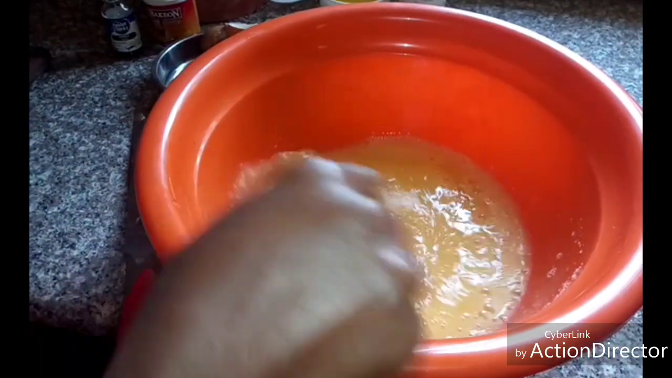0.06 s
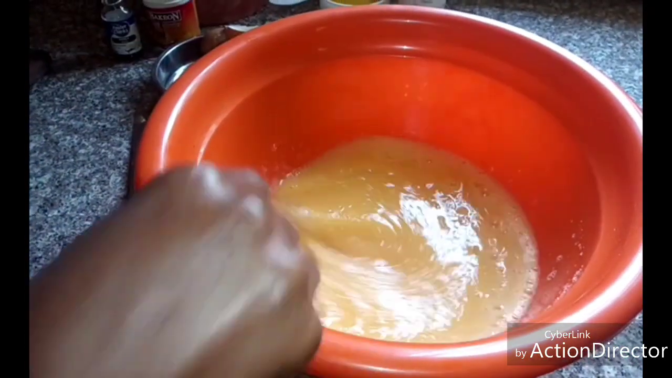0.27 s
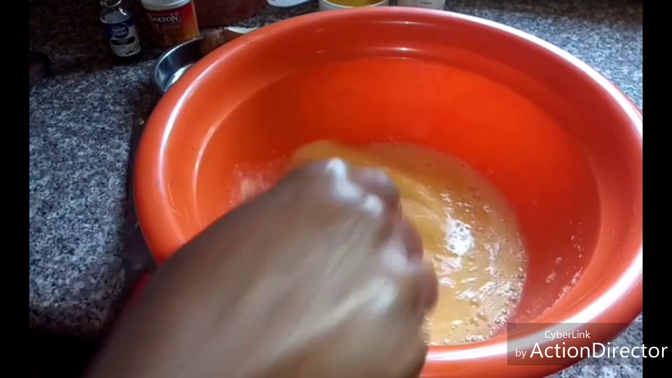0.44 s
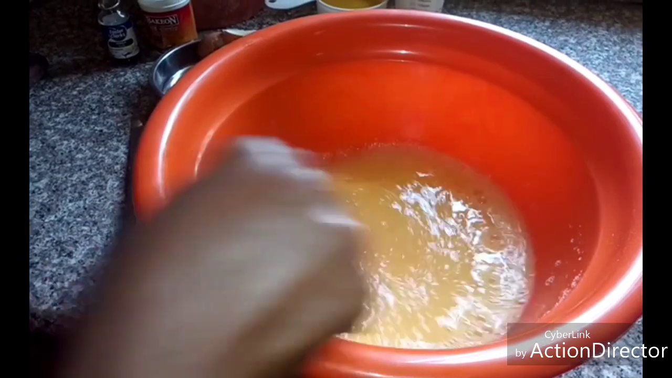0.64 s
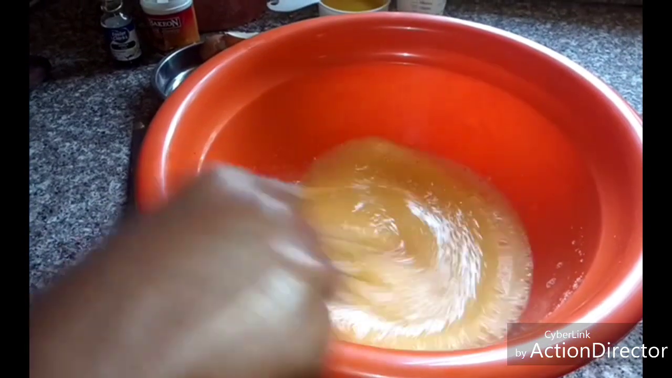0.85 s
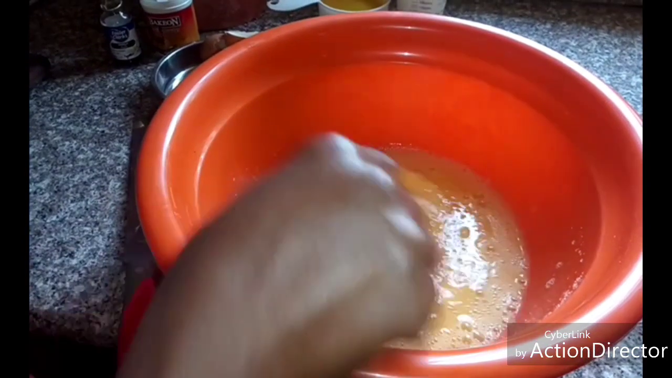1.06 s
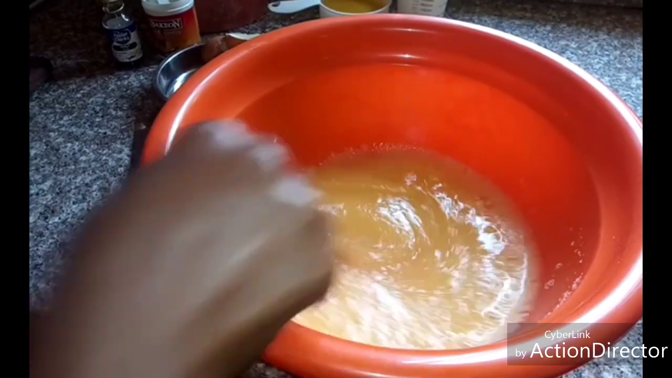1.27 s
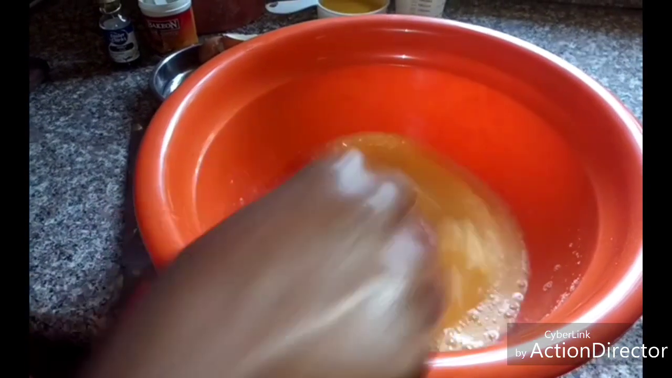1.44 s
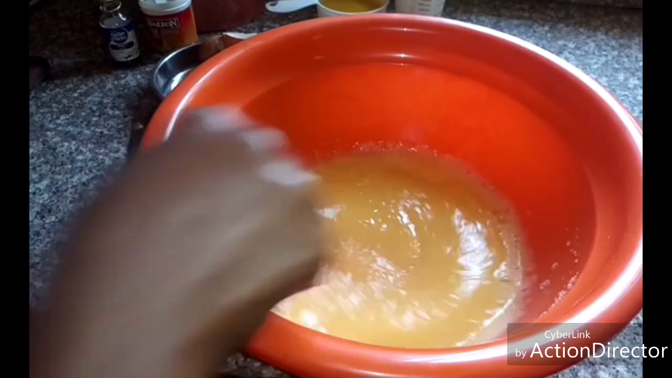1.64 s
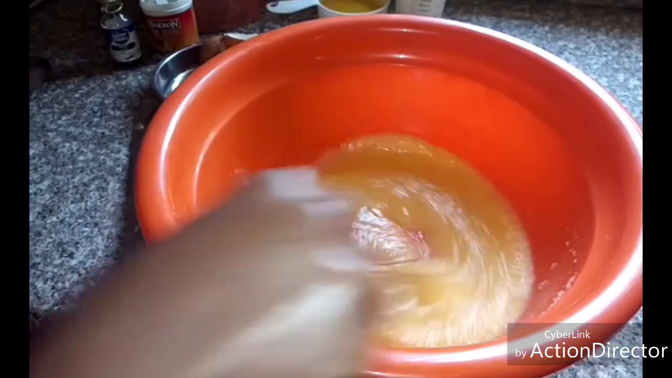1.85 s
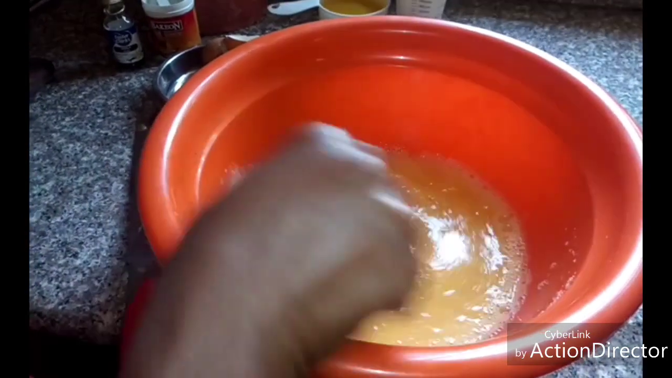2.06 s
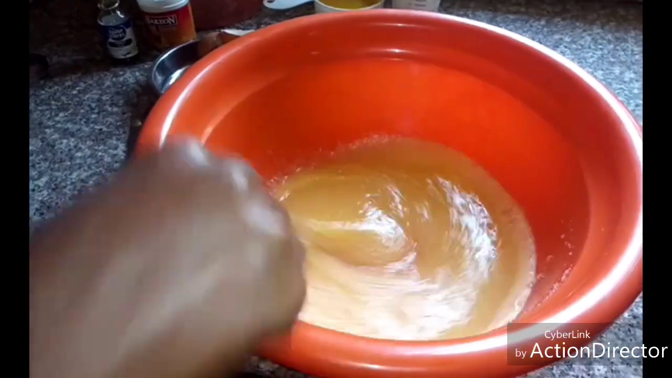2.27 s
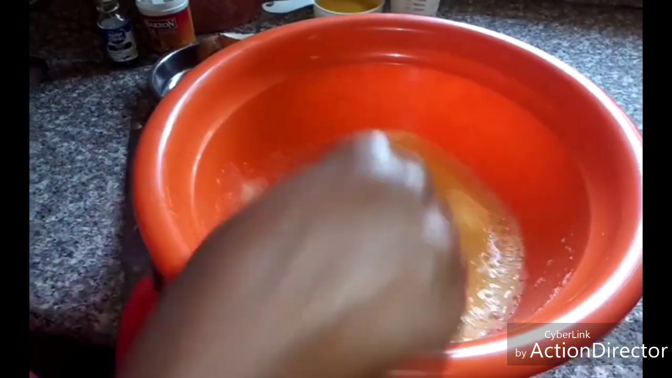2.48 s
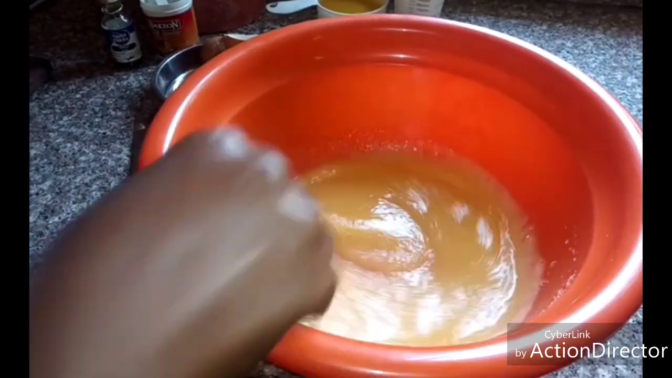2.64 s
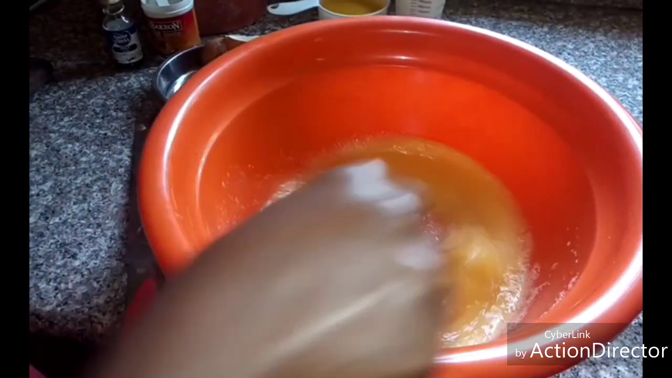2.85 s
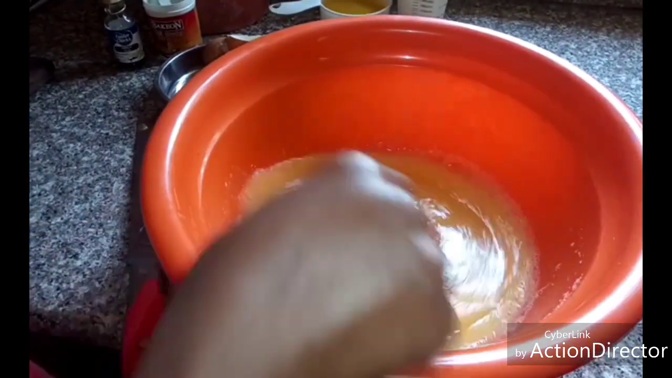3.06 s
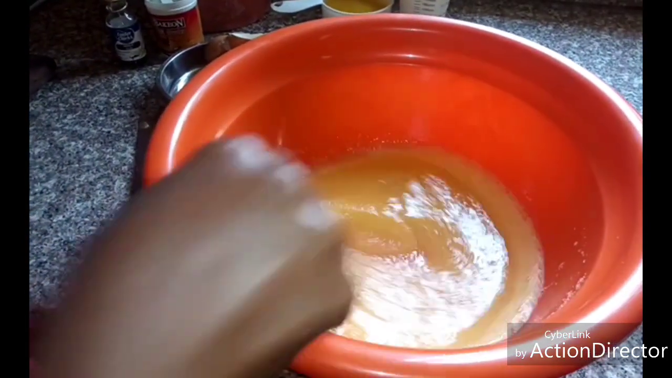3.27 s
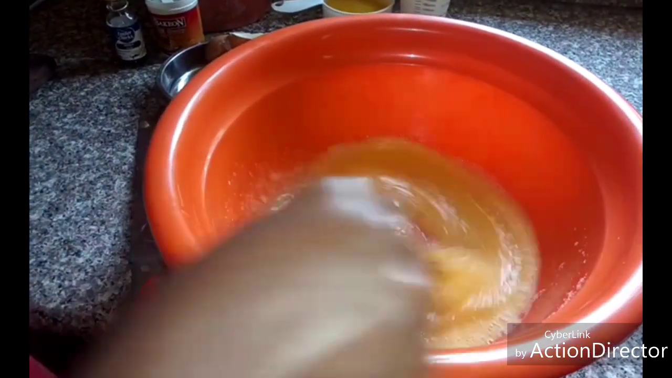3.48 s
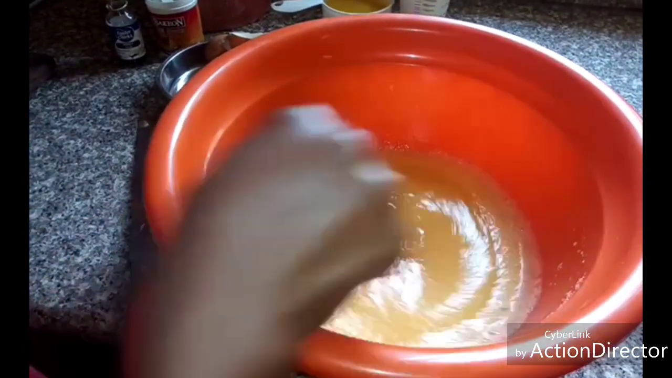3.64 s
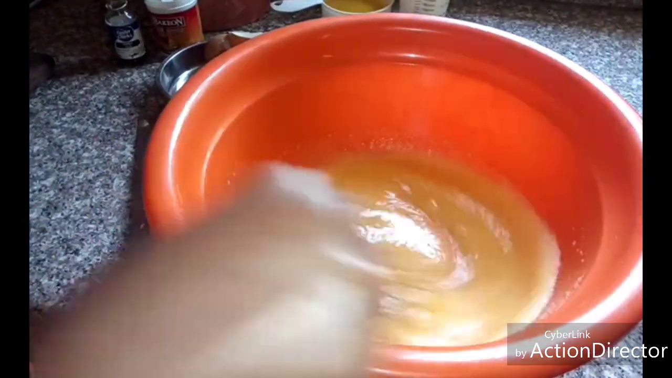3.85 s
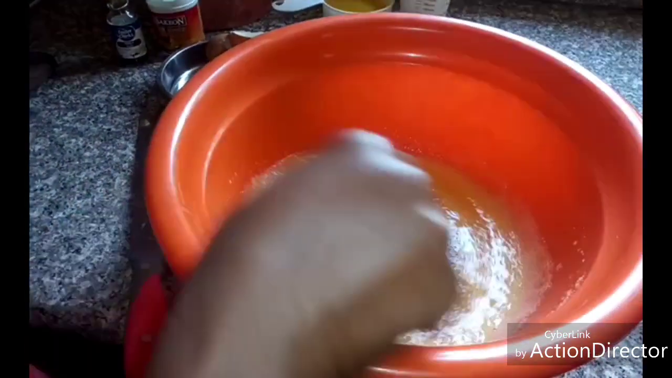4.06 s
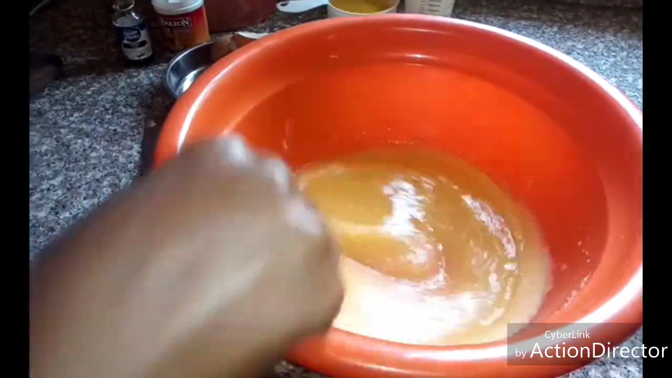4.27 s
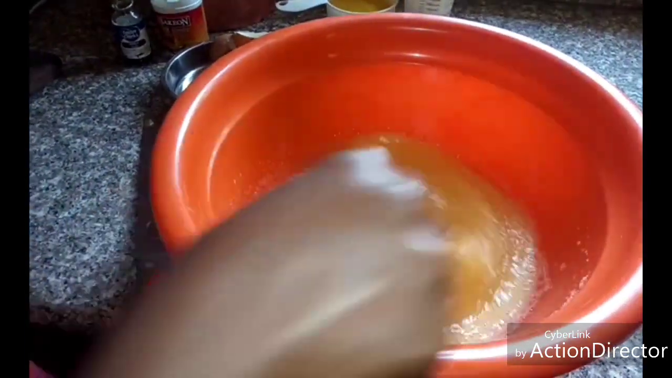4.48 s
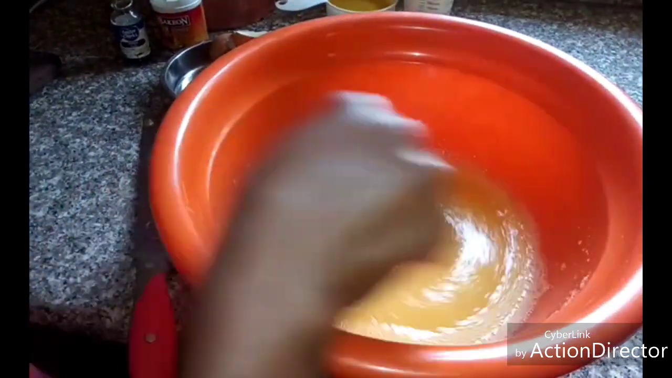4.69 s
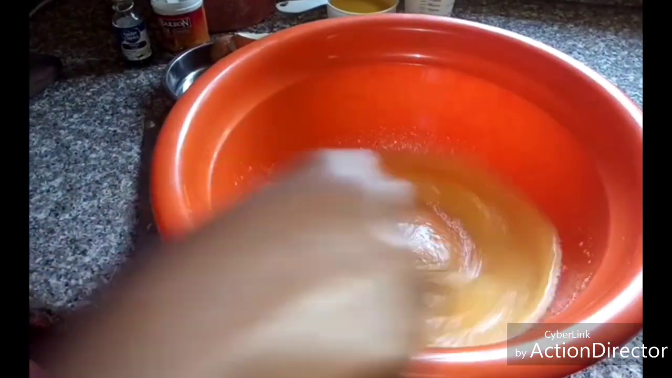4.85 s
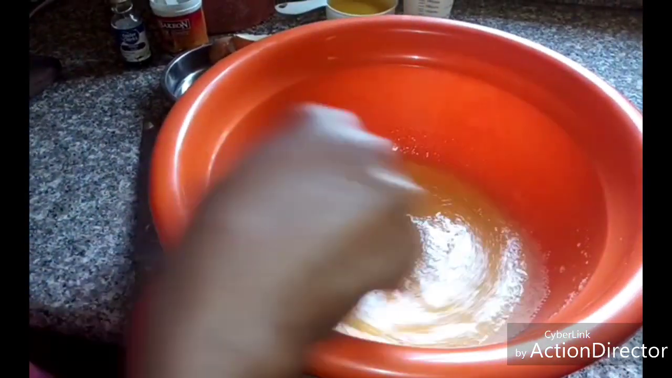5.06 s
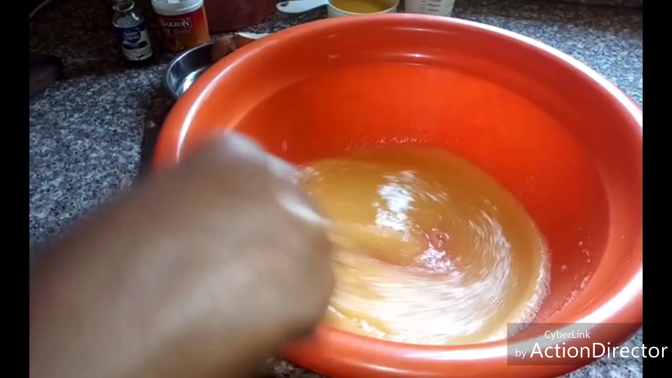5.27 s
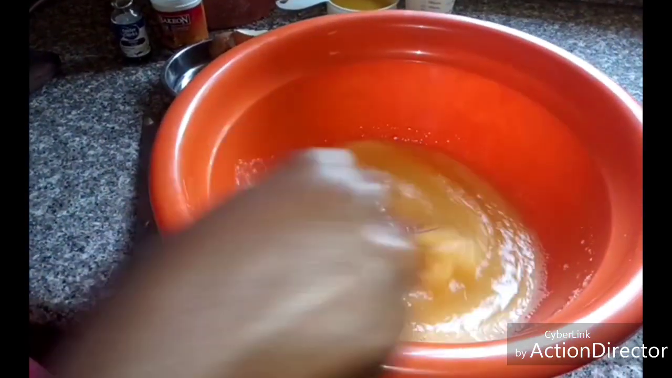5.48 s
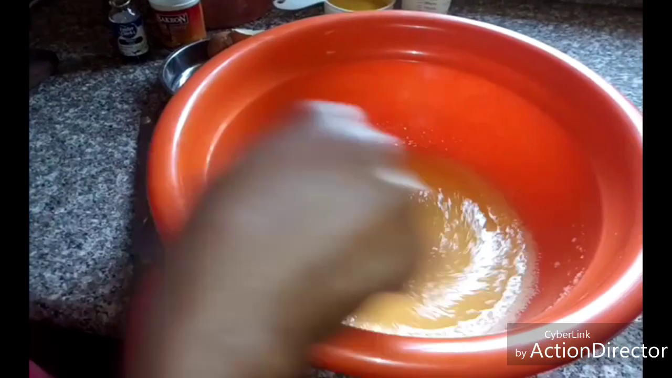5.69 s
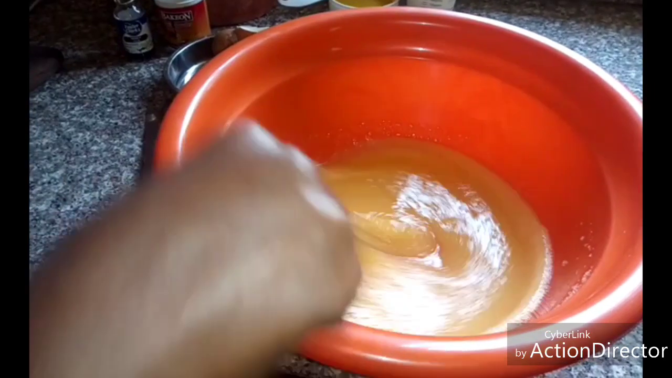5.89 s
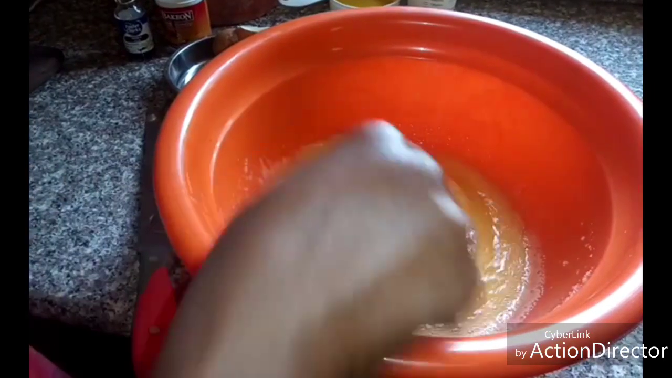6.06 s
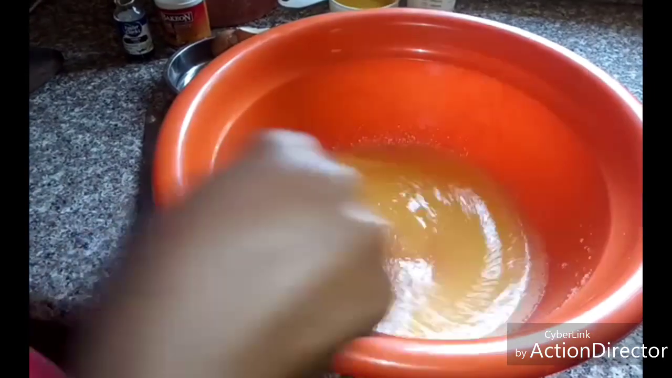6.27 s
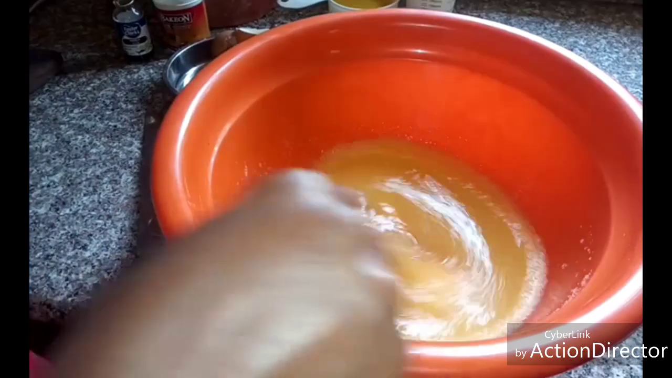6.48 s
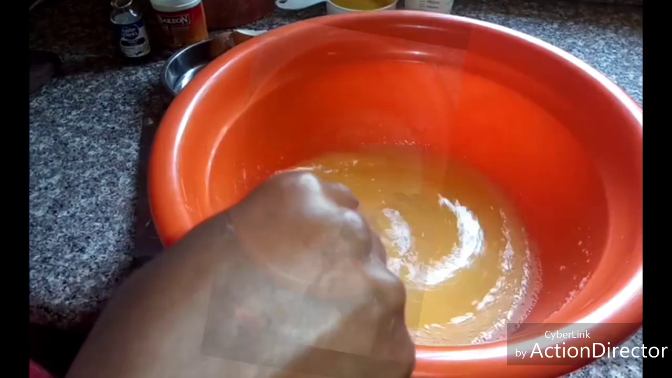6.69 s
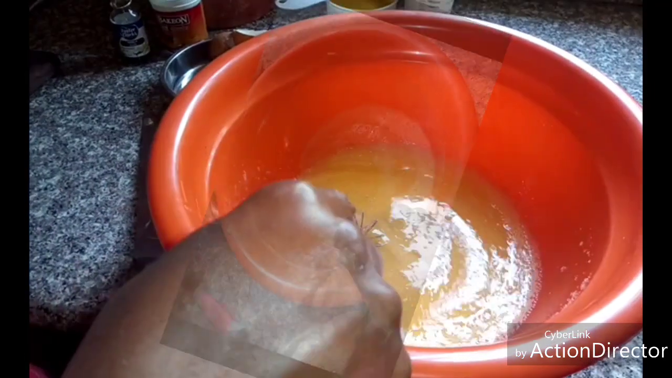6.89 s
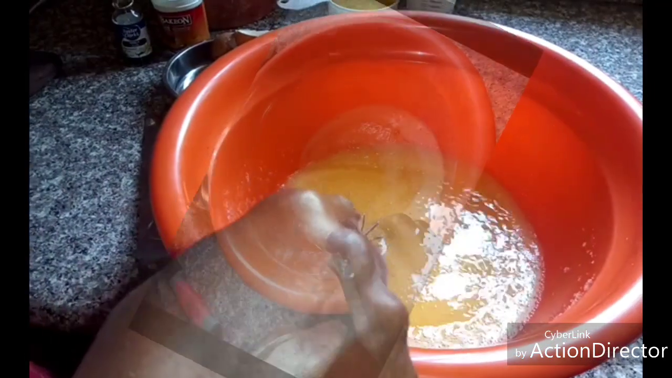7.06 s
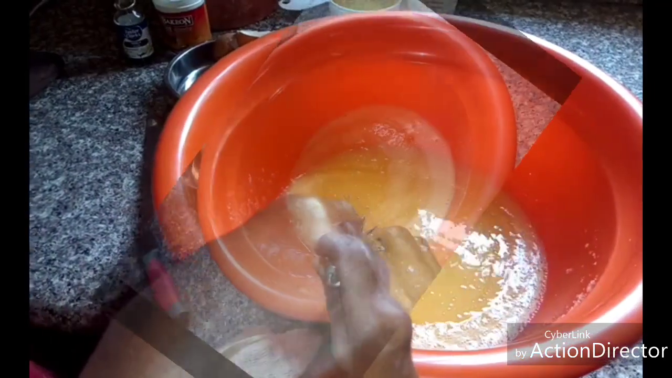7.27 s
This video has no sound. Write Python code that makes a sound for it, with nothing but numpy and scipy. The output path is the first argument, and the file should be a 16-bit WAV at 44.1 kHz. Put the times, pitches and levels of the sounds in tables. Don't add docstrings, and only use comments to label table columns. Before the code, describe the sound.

Fast wiry whisking knocks and scrapes around a hollow plastic bowl, growing harder, then suddenly ceases, leaving quiet room air, one nudge and distant chirps.

```python
import sys
import numpy as np
from scipy import signal
from scipy.fft import rfft, irfft, next_fast_len
from scipy.io import wavfile

SR = 44100
rng = np.random.default_rng(int(sys.argv[2]) if len(sys.argv) > 2 else 0)


def to_linear_factor(level_db):
    exponent = np.asarray(level_db, float) / 20
    return 10 ** exponent


def unload_wav(signal):
    wavfile.write(
        sys.argv[1],
        SR,
        np.round(np.clip(np.atleast_2d(signal).T, -1, 1) * 32767).astype(np.int16),
    )


N = 323253

# (pressure peak [s], drag level [dB], 10 dB rise [s], 10 dB fall [s], hiss re drag [dB])
STROKES = [(0.069, -36.0, 0.014, 0.272, -29.0), (0.44, -36.7, 0.071, 0.196, -32.0),
           (0.719, -34.5, 0.055, 0.254, -25.0), (1.033, -36.8, 0.012, 0.102, -20.0),
           (1.411, -37.4, 0.082, 0.892, -31.0), (1.741, -33.1, 0.041, 0.223, -29.0),
           (2.039, -30.9, 0.082, 0.278, -25.0), (2.352, -28.3, 0.015, 0.352, -28.0),
           (2.788, -27.9, 0.048, 0.153, -23.0), (3.076, -29.3, 0.035, 0.228, -26.0),
           (3.425, -26.5, 0.06, 0.032, -20.0), (3.729, -30.6, 0.138, 0.229, -23.0),
           (4.12, -31.7, 0.049, 0.033, -16.0), (4.435, -25.0, 0.036, 0.064, -28.0),
           (4.766, -27.7, 0.27, 0.114, -18.0), (5.13, -26.7, 0.03, 0.058, -26.0),
           (5.364, -28.7, 0.011, 0.281, -33.0), (5.725, -23.7, 0.019, 0.041, -19.0),
           (6.009, -32.1, 0.01, 0.232, -23.0), (6.413, -29.0, 0.037, 0.117, -44.0),
           (0.004, -32.7, 0.031, 0.024, -10.0), (0.335, -39.5, 0.116, 0.081, -18.0),
                  (1.21, -34.9, 0.009, 0.083, -25.0), (2.982, -28.3, 0.033, 0.016, -25.0),
                  (3.517, -33.5, 0.07, 0.081, -34.0), (3.959, -26.7, 0.049, 0.035, -32.0),
                  (4.078, -28.3, 0.018, 0.081, -33.0), (4.278, -35.7, 0.167, 0.054, -29.0),
                  (4.953, -33.5, 0.065, 0.104, -30.0), (5.269, -28.4, 0.041, 0.053, -41.0),
                  (5.406, -29, .008, .11, -25), (5.583, -25.9, 0.016, 0.025, -27.0),
                  (5.651, -35.7, 0.033, 0.075, -24.0), (5.896, -27.6, 0.025, 0.048, -44.0),
                  (6.221, -26.1, 0.098, 0.029, -37.0), (6.66, -42.0, 0.026, 0.05, -43.0)]
RISE_BEND, FALL_BEND = 0.8, 1.3
# (frequency [Hz], level [dB per Hz])
DRAG_SPECTRUM = [(590, -51), (1000, 1), (1410, -2), (1680, 1), (2100, 2), (2400, -1.5), (2650, -1),
                 (2950, -4), (3350, -0.5), (4120, -2.5), (6500, -14), (8500, -43.5), (11000, -69),
                 (18700, -120)]
# (frequency [Hz], level [dB per Hz])
HISS_SPECTRUM = [(7000, -25), (9000, -18.5), (10800, -11), (12600, -22.5), (13700, -15), (14900, 3),
                 (15700, 4), (16500, -20.5)]
# (frequency [Hz], width [Hz], level [dB])
HOLLOW_MODES = [(420, 60, -7), (530, 40, 0), (633, 51.3, 0.5), (783, 60, -1.5), (1052, 60, -4)]
# (frequency [Hz], width [Hz], level [dB])
ROCKING_MODES = [(64, 40, -8.5), (105.4, 49, -1), (158, 40, .5), (272, 26, 6.5)]
# (time [s], level [dB], 10 dB fall [s])
ROCK_EVENTS = [(0.142, -48.8, 0.048), (0.443, -53.2, 0.09), (0.73, -51.5, 0.118), (1.052, -47.8, 0.051),
               (1.219, -59.3, 1.332), (1.828, -52.1, 0.135), (2.046, -45.0, 0.111), (2.286, -53.2, 0.018),
               (2.403, -51.9, 0.12), (2.694, -60.0, 0.232), (3.174, -48.6, 0.027), (3.37, -56.8, 0.069),
               (3.708, -48.3, 0.091), (4.077, -47.2, 0.08), (4.318, -52.7, 0.107), (4.481, -46.8, 0.042),
               (4.699, -46.4, 0.116), (4.974, -63.1, 0.584), (5.388, -39.4, 0.076), (5.672, -54.0, 0.087),
               (5.925, -53.5, 0.049), (6.029, -54.5, 0.38), (6.701, -52.5, 0.043)]
PANEL_HZ = [1120, 1690, 2160, 2680, 3350, 4200]

# (time [s], peak [dB], ring frequency [Hz])
KNOCKS = [(0.0104, -24.5, 1640), (0.3614, -17.0, 1630), (0.6903, -17.5, 1670), (0.856, -23.0, 1550),
          (1.2396, -17.5, 1340), (1.6277, -18.5, 1170), (2.2508, -16.5, 1610), (2.6199, -20.5, 1620),
          (2.8804, -11.5, 1670), (3.0584, -21.0, 1670), (4.0572, -19.5, 1150), (4.9734, -16.5, 1630),
          (5.2774, -23.0, 1630), (5.5568, -20.0, 1600), (5.6506, -7.5, 1660), (5.7169, -13.0, 1590),
          (5.88, -16.0, 1620), (5.8934, -15.5, 1560), (6.2033, -16.5, 1400), (6.3789, -17.0, 1600),
          (6.4073, -11.0, 1460), (6.5435, -19.0, 1440), (6.6265, -24.0, 1100),
          (0.0638, -7.5, 1800), (0.0917, -8.5, 1850), (0.3167, -22.0, 1950), (0.3915, -17.5, 1930),
                (0.399, -15.0, 1780), (0.7028, -9.5, 1740), (0.7164, -20.5, 1730), (1.0146, -13.0, 1800),
                (1.0405, -12.5, 1900), (1.062, -17.5, 1800), (1.4032, -14.5, 1960), (1.9784, -18.5, 1740),
                (2.1076, -14.0, 1880), (3.0704, -18.5, 1710), (3.0849, -12.5, 1760), (3.1044, -18.0, 1780),
                (3.4037, -12.0, 1970), (3.7698, -15.0, 1890), (4.1011, -18.5, 1900), (4.4099, -18.0, 1730),
                (4.5446, -17.5, 1740), (6.0164, -16.5, 1950),
          (0.2224, -19.0, 2220), (0.3496, -14.5, 2100), (0.5337, -23.0, 2080),
                   (0.6429, -20.5, 2150), (0.9662, -22.0, 2170), (1.5229, -19.5, 2160),
                   (1.5364, -19.0, 2120), (1.6744, -14.0, 2160), (1.6904, -16.5, 2170),
                   (2.0612, -10.5, 2160), (2.36, -13.5, 2160), (2.4962, -20.0, 2130), (2.592, -19.0, 2350),
                   (3.1368, -17.5, 2160), (3.1986, -16.5, 2130), (3.2256, -18.5, 2430),
                   (3.2874, -17.5, 2360), (3.4256, -13.5, 2170), (3.5289, -12.5, 2320),
                   (3.8357, -22.0, 2190), (3.9414, -14.5, 2100), (4.131, -8.5, 2110), (4.4448, -9.5, 2190),
                   (4.6274, -13.5, 2160), (4.9621, -12.5, 2180), (5.5039, -20.5, 2280),
                   (5.7384, -13.5, 2170), (6.0546, -21.5, 2420), (6.6573, -26.5, 2280),
          (0.4469, -12.0, 2730), (0.7622, -13.5, 3110), (0.8859, -20.0, 2710),
                    (1.4975, -19.5, 2790), (1.7853, -8.0, 3120), (2.1485, -16.0, 2840),
                    (2.4364, -8.0, 2720), (2.6569, -12.5, 2770), (2.7881, -10.5, 2810),
                    (2.8424, -19.5, 2850), (3.3922, -15.0, 2560), (3.6501, -21.5, 2670), (3.7, -16.5, 2710),
                    (4.2926, -17.5, 2490), (4.6454, -21.5, 2870), (4.6972, -18.0, 2510),
                    (4.7371, -7.5, 2600), (4.7596, -10.5, 2600), (5.0843, -22.5, 3080),
                    (5.4024, -16.0, 2750), (6.115, -17.5, 2570), (6.319, -23.0, 2790),
          (0.2828, -20.5, 3720), (1.2057, -16.0, 4420), (1.3154, -15.5, 3470),
                   (1.6636, -10.5, 4010), (1.7504, -16.5, 4420), (2.0198, -20.0, 3460),
                   (2.1326, -17.5, 4220), (2.2139, -20.0, 3540), (2.7372, -16.0, 3330),
                   (2.9657, -15.5, 3380), (3.487, -19.0, 3620), (3.7194, -11.0, 4290),
                   (3.9664, -18.0, 3270), (4.0664, -19.5, 4420), (4.6563, -10.5, 3480),
                   (4.8544, -17.5, 3680), (4.8748, -14.5, 3500), (5.1093, -13.5, 3480),
                   (5.1354, -19.0, 3260), (5.3677, -9.0, 3470), (5.447, -11.5, 3680), (5.9983, -14.5, 3450),
                   (6.095, -16.0, 4410)]
# (time [s], peak [dB], ring frequency [Hz])
SKIPS = [(0.109, -21.9, 1790), (0.1157, -22.1, 1750), (0.13, -25.1, 1680), (0.1939, -28.8, 2120),
         (0.323, -22, 1700), (0.8008, -24.7, 2130), (0.8726, -29.3, 2110), (1.5531, -25.3, 1110),
         (1.6085, -28.7, 2480), (1.6183, -27.1, 2560), (1.7437, -22.1, 1830), (1.8789, -26.8, 1170),
         (2.0294, -25.0, 2190), (2.0784, -21.1, 2560), (2.1797, -23.1, 2070), (2.2593, -25.1, 1670),
         (2.326, -28, 2050), (2.3528, -23.0, 1690), (2.4564, -21.5, 1770), (2.5494, -24.9, 2150),
         (2.6458, -26.8, 2230), (2.7874, -16.5, 1830), (2.8115, -21.9, 2120), (2.8284, -21.2, 1890),
         (2.9329, -25.9, 1630), (3.1115, -21.6, 1990), (3.2164, -26.5, 2130), (3.2364, -25.5, 2440),
         (3.3501, -23.7, 2170), (3.517, -25.8, 2280), (3.552, -25.7, 2170), (3.6256, -27.0, 2160),
         (3.6641, -21.9, 1640), (3.7121, -25.7, 1640), (3.9492, -18.7, 1690), (4.0919, -20.6, 1920),
         (4.1975, -25.0, 2190), (4.2201, -26.2, 2090), (4.3844, -27.3, 1120), (4.4731, -20.7, 1700),
         (4.5696, -25.9, 2270), (4.5907, -25.8, 2220), (4.9352, -26.3, 2110), (5.2527, -25.2, 1080),
         (5.2985, -25.9, 2020), (5.427, -20.1, 1000), (5.4408, -23.4, 2010), (5.4815, -23.1, 1970),
         (5.5911, -21.6, 1680), (5.6423, -23.6, 2200), (5.6723, -23.2, 2140), (5.9063, -21.2, 1640),
         (6.0676, -22.4, 1010), (6.1258, -22.7, 2130), (6.2873, -27.5, 2200), (6.486, -24, 2150),
         (6.5137, -24.7, 1650), (6.63, -23, 2170),
         (0.2358, -27.9, 3230), (0.2446, -24.0, 3210), (0.2573, -29.2, 3270), (0.5985, -30, 5500),
              (0.6535, -24.2, 4070), (0.9068, -29.0, 2630), (1.3921, -29.8, 3530), (1.6271, -25.7, 4640),
              (1.7433, -24.4, 4240), (1.776, -22.0, 2620), (1.866, -24.6, 2680), (1.437, -25, 2700),
              (1.9567, -26.8, 3310), (2.2731, -27.0, 4080), (2.3959, -21.9, 4020), (2.6994, -24.2, 3320),
              (2.7785, -21.3, 2640), (2.7983, -19.4, 2640), (2.8812, -25.0, 3680), (3.0921, -24.5, 4300),
              (3.1582, -23.2, 4190), (3.6323, -25.4, 3350), (3.6642, -23.8, 4360), (3.6933, -28.0, 3150),
              (3.7432, -21.5, 3100), (3.8136, -25.7, 3250), (4.11, -24.1, 3910), (4.2286, -29.7, 4080),
              (4.4438, -19.8, 3730), (4.6604, -20.8, 3500), (4.7287, -20.9, 2710), (4.7719, -19.4, 3830),
              (4.7972, -23.1, 3420), (5.2376, -27.4, 3920), (5.4153, -20.7, 2690), (5.7264, -18.2, 4180),
              (5.8796, -17.3, 4170), (5.9429, -25.6, 2660), (5.998, -15.9, 5110), (6.0677, -24.9, 3900),
              (6.0879, -24.5, 2770), (6.3187, -27.0, 5800), (6.3734, -28.5, 3610), (6.499, -28, 3500)]
# (time [s], peak [dB], metal edge re peak [dB])
TICKS = [(0.0907, -24.5, -27), (0.282, -23.5, -27), (0.3167, -25, -11), (0.4459, -23.5, -19),
         (0.6445, -20.5, -22), (0.7616, -29, -17), (0.9664, -18.5, -19), (1.0385, -31, -21),
         (1.3157, -26, -26.5), (1.4016, -21.5, -40), (1.6637, -21, -26.5), (1.785, -24.5, -28),
         (2.019, -27, -24), (2.1067, -18, -40), (2.153, -20, -34), (2.6594, -21, -34.5), (2.7376, -27, -26),
         (3.0355, -19.5, -28), (3.3948, -23, -28), (3.6505, -21.5, -11.5), (3.702, -25, -22),
         (4.0594, -24, -27), (4.7307, -20, -24), (5.0417, -23.5, -29), (5.3572, -21, -15),
         (5.6473, -16, -21.5), (5.9992, -15, -20.5), (6.0556, -20.5, -33), (6.3177, -22.5, -33.5),
         (6.341, -36, -14), (6.407, -20, -35), (6.657, -36, -24)]
# (time [s], peak [dB], frequency [Hz])
BOOMS = [(0.447, -18.0, 800), (1.019, -26.5, 999), (1.629, -31.0, 638), (1.787, -24.5, 654),
         (2.022, -24.0, 643), (2.363, -26, 480), (2.435, -27.0, 999), (3.528, -24.5, 633),
         (4.057, -31.0, 926), (4.444, -21.5, 950), (4.66, -22.5, 490), (4.974, -26.0, 544),
         (5.37, -21.5, 530), (5.652, -21.0, 781), (6.015, -28.0, 450), (6.406, -24.0, 651),
         (6.659, -28.5, 579)]
# (time [s], peak [dB], frequency [Hz])
SLAPS = [(0.1203, -37.0, 410), (0.174, -29, 1200), (1.3102, -37.9, 780), (2.1295, -35.1, 640),
         (2.2609, -34.1, 570), (2.4477, -29.5, 650), (2.6178, -32.3, 600), (2.6566, -33.2, 520),
         (2.6977, -37.7, 650), (3.039, -39.5, 620), (3.1632, -35.5, 570), (3.9639, -31.8, 660),
         (4.1575, -38.6, 760), (4.3875, -33.8, 640), (4.4161, -32.5, 570), (4.7413, -30.4, 720),
         (4.7945, -35.1, 590), (4.8527, -33.5, 700), (5.1288, -34.5, 560), (5.2766, -31.1, 710),
         (5.4338, -31.3, 600), (5.5835, -29.7, 560), (5.7269, -30.8, 650), (6.4847, -36.3, 660),
         (6.5135, -36.3, 680), (6.541, -34.9, 640), (6.624, -21, 1100)]
# (time [s], peak [dB], frequency [Hz])
BUMPS = [(0.3229, -57.0, 130), (0.4625, -54.8, 150), (3.0581, -55.1, 220), (3.6885, -41.3, 150),
         (3.9262, -58.1, 170), (4.3298, -46.8, 90), (4.6791, -40.6, 130), (5.1433, -56.7, 100),
         (5.3489, -47.7, 160), (6.0199, -51.4, 140), (6.1842, -47.6, 150), (6.6822, -54.6, 220),
         (6.769, -56.0, 110)]
# (frequency [Hz], peak [dB], T60 [s])
LAST_RING = [(520, -47, .3), (1100, -55, .3), (3480, -57, .3), (4150, -59, .3), (2150, -54, .3)]

# (time [s], peak [dB], frequency [Hz], T60 [s])
THUMPS = [
    (2.361, -29.5, 272, .12),
    (6.915, -54, 90, .15),
    (6.938, -44, 94, .1),
    (6.955, -32.5, 91.6, 0.12),
    (6.991, -35, 101.4, 0.04),
]
# (time [s], peak [dB], frequency [Hz], T60 [s])
TAPS = [
    (6.925, -49, 1890, 0.15),
    (6.975, -50, 1690, 0.07),
]
# (time [s], length [s], frequency [Hz], width [Hz], level [dB])
BIRDS = [
    (6.785, 0.075, 4770, 60, -59),
    (6.854, 0.11, 4930, 300, -62.5),
    (6.86, 0.087, 5500, 300, -75),
    (6.894, .1, 4300, 200, -67),
    (7.077, .11, 5850, 350, -75),
    (7.09, .1, 5050, 300, -76),
    (7.202, 0.18, 5800, 220, -63),
]
# (frequency [Hz], level [dB per Hz])
AIR_SPECTRUM = [(18, -28.5), (30, -11), (73, -3), (355, -10.5), (889, -14.5), (4420, -19.5), (5740, -20.5),
                (7670, -38.5), (16000, -38)]


def stirring():
    strokes = np.array(STROKES).T
    clumps = to_linear_factor(4.0 * np.minimum(wander(45, 140), 1.6))
    wires = drag(strokes, clumps) + sheen(strokes, clumps) + metal_hiss(strokes, clumps)
    return wires + hollow(strokes, clumps) + rocking()


def drag(strokes, clumps):
    s, db, rise_s, fall_s, _ = strokes
    pressure = swells(s, db, rise_s, fall_s)
    slips = grains(16000, 3.0) * clumps
    dealt = rng.integers(0, 20, N)
    rattle = 0
    for k, hz in enumerate(np.geomspace(1000, 8000, 20)):
        patch = to_linear_factor(3.0 * wander(11, 12.8))
        ring = resonance(slips * patch * (dealt == k), hz, 0.099 * hz)
        rattle = rattle + resonance(ring, hz, 0.18 * hz)
    return to_linear_factor(-2.3) * pressure * coloured(rattle, DRAG_SPECTRUM)


def sheen(strokes, clumps):
    s, db, rise_s, fall_s, _ = strokes
    shimmer = resonance(rms_one(grains(4000, 3.0) * clumps), 8700, 2500)
    return swells(s, db - 36, rise_s, fall_s, 1.7) * shimmer


def metal_hiss(strokes, clumps):
    s, db, rise_s, fall_s, metal_db = strokes
    flicker = to_linear_factor(-1.5 + 3.5 * wander(14, 30))
    noise = coloured(rng.standard_normal(N) * clumps ** 0.75, HISS_SPECTRUM)
    return flicker * swells(s, db + metal_db, rise_s, fall_s, 2.5) * noise


def hollow(strokes, clumps):
    s, db, rise_s, fall_s, _ = strokes
    return swells(s, db - 11.5, rise_s, fall_s, 1.25) * body(grains(900, 4.2) * clumps, HOLLOW_MODES)


def rocking():
    s, db, fall_s = np.transpose(ROCK_EVENTS)
    rise_s = 0.04
    return swells(s, db, rise_s, fall_s) * body(grains(250, 4.4), ROCKING_MODES)


def knocks():
    hits = np.array(KNOCKS)
    hollow_db, lead_s = -16, 0.0007
    out, cracks = np.zeros(N), np.zeros(N)
    luck = rng.random((len(hits), 4, 6))
    for (s, db, hz), (hollow_pitch, hollow_gain, panel_pitch, panel_gain) in zip(hits, luck):
        patch_t60_s = 0.024 * min(2000 / hz, 1) ** 1.5
        patch = struck([hz, 1.07 * hz], np.array([1, 0.6]), patch_t60_s, 0.0017)
        panel = struck(PANEL_HZ * (0.97 + 0.06 * panel_pitch), panel_gain - 0.5, 0.022, 0.0013)
        cavity = struck(420 * 2.244 ** hollow_pitch, hollow_gain - 0.5, 0.053, 0.0022)
        add(out, s - lead_s, to_linear_factor(db - 6.5) * patch)
        add(out, s - lead_s, to_linear_factor(db - 10.5) * panel)
        add(out, s - lead_s, to_linear_factor(db - 6.5 + hollow_db) * cavity)
        puff = burst(0.0006, 0.022)
        add(cracks, s, to_linear_factor(db) * peak_one(resonance(puff, hz, 1.13 * hz) + to_linear_factor(-6.0) * puff))
    return out + to_linear_factor(-4.5) * cracks.std() * coloured(cracks, DRAG_SPECTRUM)


def skips():
    out, cracks = np.zeros(N), np.zeros(N)
    ring_t60_s, crack_t60_s = 0.018, 0.016
    for s, db, hz in np.array(SKIPS):
        add(out, s, to_linear_factor(db - 6.0) * struck([hz, 1.09 * hz], np.array([1, 0.7]), ring_t60_s, 0.0016))
        puff = burst(0.0006, crack_t60_s)
        crack = peak_one(resonance(puff, hz, 1.2 * hz) + to_linear_factor(-3.0) * puff)
        add(cracks, s + 0.0008, to_linear_factor(db) * crack)
    return out + to_linear_factor(-1.5) * cracks.std() * coloured(cracks, DRAG_SPECTRUM)


def ticks():
    snaps, edges = np.zeros(N), np.zeros(N)
    bright = signal.butter(4, [3800, 6700], "band", fs=SR, output="sos")
    for s, db, edge_db in TICKS:
        snap = peak_one(signal.sosfilt(bright, burst(0.00027, 0.021)))
        add(snaps, s, to_linear_factor(db - 2.5) * snap)
        add(edges, s, to_linear_factor(db + edge_db + 4.0) * burst(0.0005, 0.037))
    return snaps + edges.std() * coloured(edges, HISS_SPECTRUM)


def booms():
    out = np.zeros(N)
    for s, db, hz in BOOMS:
        wave = struck([hz, 1.3 * hz, 0.74 * hz], np.array([1, 0.5, 0.4]), 0.07, 0.0022)
        add(out, s, to_linear_factor(db - 1.5) * wave)
    return out


def slaps():
    out = np.zeros(N)
    slap_t60_s, bump_t60_s, last_touch_s = 0.06, 0.12, 6.662
    for s, db, hz in SLAPS:
        add(out, s, to_linear_factor(db - 4.0) * struck([hz, 0.78 * hz], np.array([1, 0.4]), slap_t60_s, 0.004))
    for s, db, hz in BUMPS:
        add(out, s, to_linear_factor(db - 3.5) * struck([hz], np.ones(1), bump_t60_s, 0.014))
    for hz, db, t60_s in LAST_RING:
        wave = struck([hz, 1.012 * hz], np.array([1, 0.6]), t60_s, 0.004)
        add(out, last_touch_s, to_linear_factor(db) * wave)
    return out


def nudges():
    out = np.zeros(N)
    for s, db, hz, t60_s in THUMPS:
        add(out, s, to_linear_factor(db) * struck([hz], np.ones(1), t60_s, 1.0 / hz))
    for s, db, hz, t60_s in TAPS:
        modes_hz = hz * rng.uniform(0.7, 1.4, 20)
        add(out, s, to_linear_factor(db) * struck(modes_hz, rng.normal(0, 1, 20), t60_s, 0.0013))
    return out


def kitchen(x):
    t60_s, wall_cut_hz = 0.23, 6000
    t = np.arange(SR // 2) / SR
    echoes = rng.standard_normal(len(t)) * to_linear_factor(-60 * t / t60_s) * (1 - np.exp(-t / 0.006))
    echoes = echoes + 0.3 * sum(resonance(echoes, hz, 260) for hz in PANEL_HZ)
    echoes = signal.sosfilt(signal.butter(1, wall_cut_hz, fs=SR, output="sos"), echoes)
    return signal.fftconvolve(x, echoes / np.sqrt(np.sum(echoes ** 2)))[:N]


def birds():
    out, white = np.zeros(N), rng.standard_normal(SR // 4)
    for s, length_s, hz, width_hz, db in BIRDS:
        whistle = rms_one(resonance(resonance(white, hz, width_hz), hz, width_hz))
        count = round(length_s * SR)
        add(out, s, to_linear_factor(db) * whistle[-count:] * signal.windows.tukey(count, 0.7))
    return out


def still_air():
    air = to_linear_factor(-67.5) * coloured(rng.standard_normal(N), AIR_SPECTRUM)
    capsule = to_linear_factor(-87) * coloured(rng.standard_normal(N), HISS_SPECTRUM[-4:])
    return air + capsule


def swells(s, db, rise_s, fall_s, steeper=1):
    s, db, rise_s, fall_s = [np.reshape(v, (-1, 1)) for v in (s, db, rise_s, fall_s)]
    coarse = np.arange(0, N + 64, 64)
    late_s = coarse / SR - s
    up = np.maximum(-late_s, 0) / rise_s
    down = np.maximum(late_s, 0) / fall_s
    gains = to_linear_factor(db - 10 * steeper * (up ** RISE_BEND + down ** FALL_BEND))
    return np.interp(np.arange(N), coarse, np.sqrt(np.sum(gains ** 2, axis=0)))


def wander(hz, width_hz):
    slow = resonance(rng.standard_normal(N // 20 + 2), 20 * hz, 20 * width_hz)
    return np.interp(np.arange(N) / 20, np.arange(len(slow)), rms_one(slow))


def grains(per_s, spread_db):
    sizes = to_linear_factor(spread_db * np.minimum(rng.exponential(1, N), 3.3)) * rng.choice([-1, 1], N)
    return sizes * (rng.random(N) < per_s / SR) + 1e-18


def body(x, modes):
    out = 0
    for hz, width_hz, db in modes:
        swell = to_linear_factor(db + 3.0 * wander(5, 13))
        out = out + resonance(resonance(x * swell, hz, width_hz), hz, 3.0 * width_hz)
    return rms_one(out)


def struck(hz, gains, t60_s, rise_s):
    t = np.arange(round(min(np.max(t60_s), 0.25) * SR)) / SR
    sines = np.sin(2 * np.pi * np.outer(hz, t))
    wave = gains @ (sines * to_linear_factor(-60 * t / np.reshape(t60_s, (-1, 1))))
    return peak_one(wave * (1 - np.exp(-(t / rise_s) ** 2)))


def burst(rise_s, t60_s):
    t = np.arange(round(0.1 * SR)) / SR
    return (1 - np.exp(-t / rise_s)) * to_linear_factor(-60 * t / t60_s) * rng.standard_normal(len(t))


def resonance(x, hz, width_hz):
    r = np.exp(-np.pi * width_hz / SR)
    poles = [1, -2 * r * np.cos(2 * np.pi * hz / SR), r * r]
    return signal.lfilter([(1 - r * r) / 2, 0, (r * r - 1) / 2], poles, x)


def coloured(x, spectrum):
    hz, level_db = np.transpose(spectrum)
    size = next_fast_len(N)
    grid_hz = np.maximum(np.fft.rfftfreq(size, 1 / SR), 1)
    gain = to_linear_factor(np.interp(np.log(grid_hz), np.log(hz), level_db))
    return rms_one(irfft(rfft(x, size) * gain, size)[:N])


def rms_one(x):
    return x / np.sqrt(np.mean(x ** 2) + 1e-20)


def peak_one(x):
    return x / np.max(np.abs(x))


def add(out, s, wave):
    i = max(round(s * SR), 0)
    out[i:i + len(wave)] += wave[:N - i]


def scene():
    lively = stirring() + knocks() + skips() + ticks() + booms() + slaps() + birds()
    kitchen_db = -14
    return (lively + to_linear_factor(kitchen_db) * kitchen(lively) + nudges() + still_air())[None]


def top_cut(x):
    return signal.sosfilt(signal.butter(12, 16810, fs=SR, output="sos"), x)


def record(dry):
    mix = signal.sosfilt(signal.cheby2(8, 30, 15800, fs=SR, output="sos"), dry)
    return top_cut(mix)


dry = scene()
out = record(dry)
unload_wav(out)
```